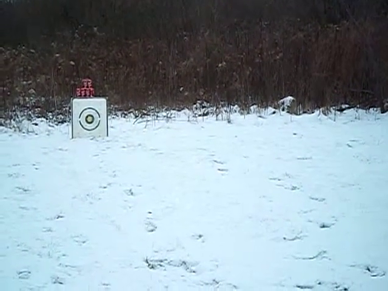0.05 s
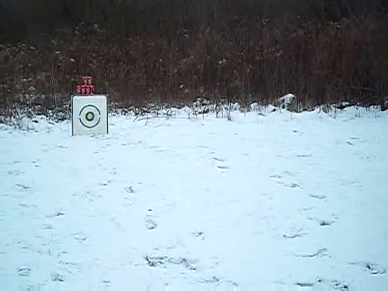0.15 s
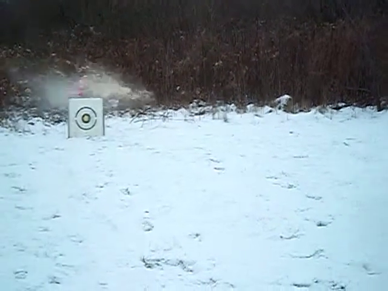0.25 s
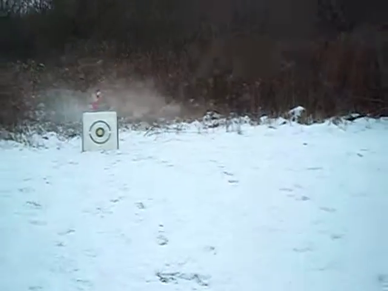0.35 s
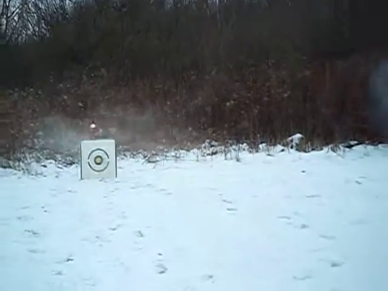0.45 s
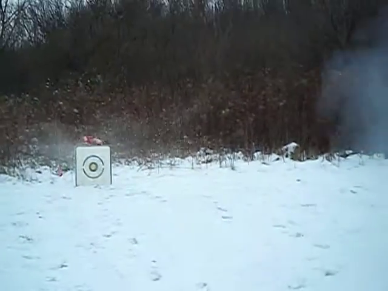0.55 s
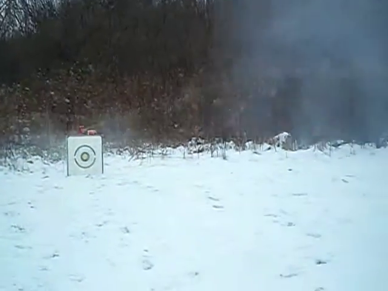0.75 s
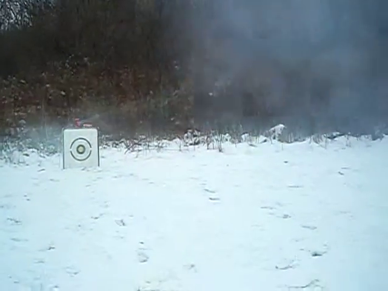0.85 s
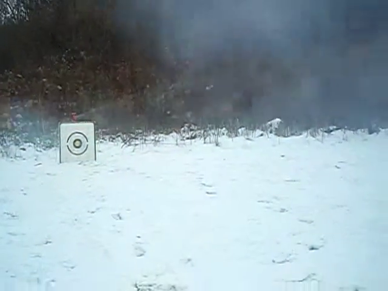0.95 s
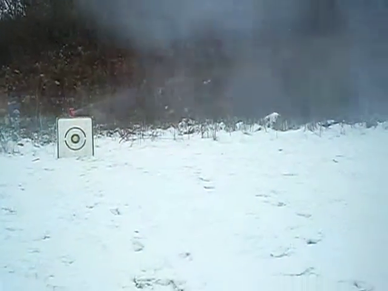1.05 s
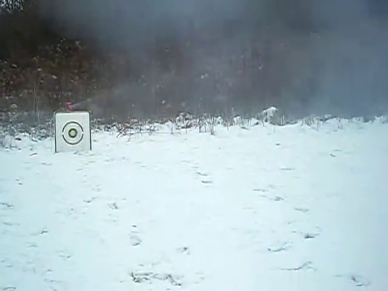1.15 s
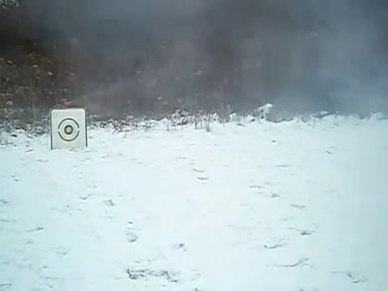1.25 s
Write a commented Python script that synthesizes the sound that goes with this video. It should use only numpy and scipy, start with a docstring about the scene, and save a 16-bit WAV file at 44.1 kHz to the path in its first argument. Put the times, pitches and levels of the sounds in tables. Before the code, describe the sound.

A close muzzleloader shot cracks, hits cans with a bang and hiss, and echoes through trees.

```python
"""In a snowy field, a muzzleloader fires beside a camera. Its crack and blast overload the microphone.
A tenth of a second later the shot hits some cans, which burst with a bang and a hiss of spray.
The trunks of the surrounding woods throw the shot back as a dense roar that slowly dulls, with one
late, thin, bright echo. Underneath are quiet air, a low rumble and the camera's faint whine."""
import sys
import numpy as np
from scipy import signal
from scipy.fft import rfft, irfft
from scipy.io import wavfile
from scipy.ndimage import uniform_filter1d

SR = 44100
rng = np.random.default_rng(int(sys.argv[2]) if len(sys.argv) > 2 else 0)


def transcribe(signal):
    """Save signal, clipped to [-1, 1], as a 16-bit WAV file at the path in sys.argv[1]."""
    frames = np.atleast_2d(signal).T
    limited = np.clip(frames, -1, 1)
    pcm = np.round(limited * 32767).astype(np.int16)
    wavfile.write(sys.argv[1], SR, pcm)


N = 57330
T = np.arange(N) / SR

# The tone of each sound, from bass to treble. Each row: frequency in Hz, relative level in dB.
AIR_TONE = [(40, -19), (180, -2.5), (260, -7), (330, 9), (400, -6), (850, -0.5), (1100, -10), (2000, -16),
            (5500, -17.5)]
LATE_ECHO_TONE = [(1000, -40), (1900, -3), (2400, 8), (3200, -3.5), (5000, -15)]
RUMBLE_TONE = [(15, -11), (30, -9), (60, 1), (105, -1.5), (135, -7), (185, -21), (300, -41.5), (800, -61.5)]
ROAR_TONE = [(100, -43.5), (250, -17.5), (400, -12.5), (560, -0.5), (830, 2.5), (1050, 1), (1300, -9.5),
             (2000, -17), (3500, -49.5), (5500, -52.5)]
ROAR_TREBLE_TONE = [(300, -36.5), (900, -10.5), (1450, 3), (2200, 1), (3000, 1), (4000, -4), (4900, -3.5),
                    (5500, -22)]
ECHO_TONE = [(200, -28.5), (400, -6.5), (620, 3), (5500, 0)]  # thin trunks return little bass
SPRAY_TONE = [(100, -3.5), (280, -14.5), (600, -5.5), (1000, -3.5), (1900, -9), (3000, -1.5), (4600, 2),
              (5500, -10)]
CAN_TONE = [(30, -13.5), (130, 3.5), (250, -10.5), (650, -2.5), (1000, 0.5), (1700, 1), (2600, -5),
            (4000, -10), (5500, -9.5)]
GROUND_TONE = [(30, 10.5), (140, -19), (240, 6), (450, -1.5), (700, 2), (1100, -7.5), (2000, -4),
               (3200, -4.5), (4500, 0), (5500, -1)]
CRACK_TONE = [(30, -36), (150, -21), (300, 4.5), (480, -1.5), (1000, 2), (1800, 1.5), (2600, 5),
              (4000, -2.5), (5500, -5)]
BLAST_TONE = [(30, -26.5), (150, 4.5), (310, 6.5), (480, 8.5), (1000, 7), (1800, 0), (2600, 1.5),
              (4000, 0.5), (5500, -0.5)]
# How the longer sounds swell and fade. Each row: time in seconds, level in dB.
LATE_ECHO_LEVELS = [(1.15, -52), (1.168, -26.5), (1.19, -45.5)]
RUMBLE_LEVELS = [(0, -51), (.15, -50), (.24, -52), (.36, -25), (.43, -44.5), (.55, -27.5), (.76, -38.5),
                 (.86, -30), (.95, -36.5), (1.05, -37), (1.15, -38), (1.3, -39)]
ROAR_LEVELS = [(.36, -49), (.445, -64), (.46, -24.5), (.50, -27), (.535, -18.5), (.58, -19.5), (.61, -24.5),
               (.66, -23.5), (.74, -20), (.79, -19), (.825, -16), (.87, -22.5), (.98, -20.5), (1.07, -26),
               (1.3, -28.5)]
ROAR_TREBLE_LEVELS = [(.44, -38), (.47, -26.5), (.56, -24.5), (.61, -25.5), (.72, -27), (.83, -23.5),
                      (.89, -28.5), (1.02, -32), (1.14, -32.5), (1.3, -37.5)]
SPRAY_LEVELS = [(.352, -43), (.362, -27), (.374, -15.5), (.381, -18), (.392, -16.5), (.415, -26.5),
                (.445, -31.5), (.475, -23.5), (.56, -58.5), (.7, -49.5)]
# Short knocks. Each row: start in seconds, level in dB before filtering, pitch in Hz, ring in seconds.
SINGLE_ECHOES = [(.4203, -14, 940, 0.0015), (.4370, -17.5, 1780, 0.0021), (.4560, -15, 850, 0.00065),
                 (0.4957, -15.5, 855, 0.0031), (.5798, -9, 798, 0.0017), (.6270, -10, 1880, 0.0016),
                 (0.8197, -7, 1457, 0.0015), (0.8232, -9, 905, .0014), (1.0413, -11.5, 880, 0.0023),
                 (1.0830, -14, 950, 0.0032)]  # these stand out from the roar
DEEP_THUD = [(.8225, -13, 103, .017)]
HOLLOW_CRACK = [(.2428, 3, 300, .0035)]
# Sudden bangs. Each row: start in seconds, hold in seconds, level in dB, fall in dB per second.
CAN_BURSTS = [(.3486, 0.0039, 6.5, 9000), (.3541, 0.0026, -5, 2999)]
CRACK_BURST = [(.2419, 0.0045, 7, 8000)]
BLAST_SURGES = [(.2558, 0.0014, -3, 3000), (.2579, 0.0046, 9, 2402), (.2715, 0.0009, -3, 1203)]
# The camera's whine. Each row: pitch in Hz, level in dB.
WHINE_PITCHES = [(5340, -57), (5680, -67.5)]
# The microphone's loss of treble. Each row: frequency in Hz, gain in dB.
MIC_RESPONSE = [(4950, -0.5), (5250, 0), (5600, -1), (6000, -14), (6600, -62.5), (8000, -101.5)]


def amp(db):
    """Turns decibels into a number to multiply by."""
    return 10 ** (np.asarray(db) / 20)


def unit(x):
    """Scales a sound to an average strength (rms) of 1."""
    return x / np.sqrt(np.mean(x ** 2) + 1e-20)


def tone_db(tone, hz):
    """Looks up a tone table's dB at any frequency, on a logarithmic axis."""
    row_hz, db = np.transpose(tone)
    return np.interp(np.log(hz + 1), np.log(row_hz + 1), db)


def level(rows):
    """Gain over time; silent outside the rows, unless they reach the scene's start or end."""
    times, db = np.transpose(rows)
    before = db[0] if times[0] < .1 else -120
    after = db[-1] if times[-1] > 1.25 else -120
    return amp(np.interp(T, times, db, left=before, right=after))


def colour(x, tone):
    """Gives a sound a tone, with a filter that never rings ahead of the sound."""
    size = 8192
    log_gain = np.log(amp(tone_db(tone, abs(np.fft.fftfreq(size, 1 / SR)))))
    response = np.exp(np.conj(signal.hilbert(log_gain)))
    taps = np.fft.ifft(response).real[:size // 2]
    return signal.fftconvolve(x, taps)[:N]


def noise(tone):
    """Noise of strength 1 with the given tone."""
    return unit(colour(rng.standard_normal(N), tone))


def steady(x, samples):
    """Evens out a noise's slow chance swells, holding its strength near 1."""
    return x / np.sqrt(abs(uniform_filter1d(x ** 2, samples)) + 1e-12)


def clicks(per_s, spread_db):
    """A dense stream of clicks of random size and sign."""
    size = amp(spread_db * np.minimum(rng.exponential(1, N), 4))
    return size * rng.choice([-1, 1], N) * (rng.random(N) < per_s / SR)


def knocks(rows):
    """Short tones that swell and die within a few vibrations."""
    out = np.zeros(N)
    for start, db, hz, ring in rows:
        span = (T > start) & (T < start + 10 * ring)
        age = T[span] - start
        rise = 2 * age / ring
        out[span] += amp(db) * (rise * np.exp(1 - rise)) ** 2 * np.sin(2 * np.pi * hz * age)
    return out


def bursts(rows, tone, attack_s=0.00075):
    """Bangs of churning air: noise that jumps up, holds briefly and falls fast."""
    envelope = np.zeros(N)
    for start, hold, db, fall in rows:
        attack = np.clip((T - start) / attack_s, 0, 1)
        envelope += attack * amp(db - np.clip(fall * (T - start - hold), 0, 200))
    return envelope * steady(noise(tone), samples=220)


def air(db=-51):
    """The quiet air over the field."""
    return amp(db) * noise(AIR_TONE)


def camera_whine(half_width_hz=130):
    """Two faint, unsteady high tones, each a narrow band of noise."""
    hz = np.fft.rfftfreq(N, 1 / SR)
    out = np.zeros(N)
    for pitch, db in WHINE_PITCHES:
        band = rfft(rng.standard_normal(N)) / (1 + ((hz - pitch) / half_width_hz) ** 2)
        out += amp(db) * unit(irfft(band, N))
    return out


def late_echo():
    """One late, thin, bright echo of the shot."""
    return level(LATE_ECHO_LEVELS) * noise(LATE_ECHO_TONE)


def air_dulling(x, db_per_khz_s=4, unchanged_at_s=0.53):
    """Later echoes cross more air, so the tone tilts from brighter to duller."""
    hz, times, spectrum = signal.stft(x, SR, nperseg=256)
    gain = amp(-db_per_khz_s * np.outer(hz / 1000, times - unchanged_at_s))
    return signal.istft(spectrum * gain, SR, nperseg=256)[1][:N]


def woods():
    """Countless trunks each return a small copy of the shot: a roar, with a rumble and a thud below."""
    trunks = clicks(per_s=2900, spread_db=4)
    body = steady(colour(trunks, ROAR_TONE), samples=1500)
    treble = colour(trunks + clicks(per_s=5200, spread_db=2.5), ROAR_TREBLE_TONE)
    treble = steady(air_dulling(treble), samples=1500)
    roar = level(ROAR_LEVELS) * body + level(ROAR_TREBLE_LEVELS) * treble
    rumble = level(RUMBLE_LEVELS) * steady(noise(RUMBLE_TONE), samples=2200)
    return roar + rumble + knocks(DEEP_THUD) + colour(knocks(SINGLE_ECHOES), ECHO_TONE)


def cans():
    """The cans burst with a bang, and their spray hisses as many tiny clicks."""
    spray = steady(colour(clicks(per_s=11000, spread_db=6.5), SPRAY_TONE), samples=500)
    return bursts(CAN_BURSTS, CAN_TONE) + level(SPRAY_LEVELS) * spray


def ground_scatter(peak_s=.268, peak_db=-12, rise_db_per_s=275, fall_db_per_s=216):
    """The nearby ground scatters the shot from the crack onward, most strongly just after the blast."""
    db = peak_db - np.maximum(fall_db_per_s * (T - peak_s), rise_db_per_s * (peak_s - T))
    return (T > CRACK_BURST[0][0]) * amp(db) * noise(GROUND_TONE)


def boom(start_s=.270, db=-9, fade_60_db_s=0.17, start_hz=301, end_hz=150.5, sink_s=0.022, rough=0.68):
    """A low boom after the blast: a tone roughened by noise sinks in pitch and dies quickly."""
    age = np.maximum(T - start_s, 0)
    hz = (age > 0) * (end_hz + (start_hz - end_hz) * np.exp(-age / sink_s))
    phase = 2 * np.pi * np.cumsum(hz) / SR
    flutter = noise([(93, 0), (186, -8), (1860, -60)])
    wave = np.sqrt(1 - rough ** 2) * np.sin(phase) + rough * flutter * np.cos(phase)
    return (age > 0) * amp(db - 60 * age / fade_60_db_s) * wave


def pressure_wave(middle_s=.2652, half_s=0.0023, peak_db=5.5):
    """The blast pushes the air, then sucks it back."""
    offset = (T - middle_s) / half_s
    return -amp(peak_db) * offset * np.exp((1 - offset ** 2) / 2)


def muzzleloader():
    """The shot: a hollow crack, then a blast in three surges, a boom and scatter from the ground."""
    crack = bursts(CRACK_BURST, CRACK_TONE) + knocks(HOLLOW_CRACK)
    blast = bursts(BLAST_SURGES, BLAST_TONE) + pressure_wave()
    return crack + blast + boom() + ground_scatter()


def scene():
    """Everything reaches one microphone, which feeds both channels."""
    return np.tile(muzzleloader() + cans() + woods() + air() + late_echo(), (2, 1))


def record(dry, overload_limit=1.09, cutoff_hz=16500, left_lag_samples=4):
    """The microphone overloads and loses treble; the whine joins in and the peaks are cut off again."""
    overloaded = np.clip(dry.mean(0), -overload_limit, overload_limit)
    mic_gain = amp(tone_db(MIC_RESPONSE, np.fft.rfftfreq(2 * N, 1 / SR)))
    dulled = irfft(rfft(overloaded, 2 * N) * mic_gain)[:N]
    clipped = np.clip(dulled + camera_whine(), -1, 1)
    lowpass = signal.firwin(101, cutoff_hz, window=("kaiser", 7), fs=SR)
    right = signal.oaconvolve(clipped, lowpass, "same")
    left = np.pad(right, (left_lag_samples, 0))[:N]
    return np.array([left, right])


dry = scene()
out = record(dry)
transcribe(out)
```